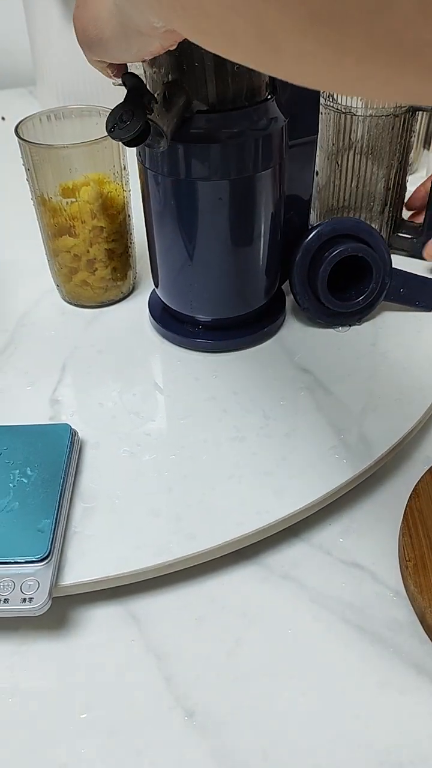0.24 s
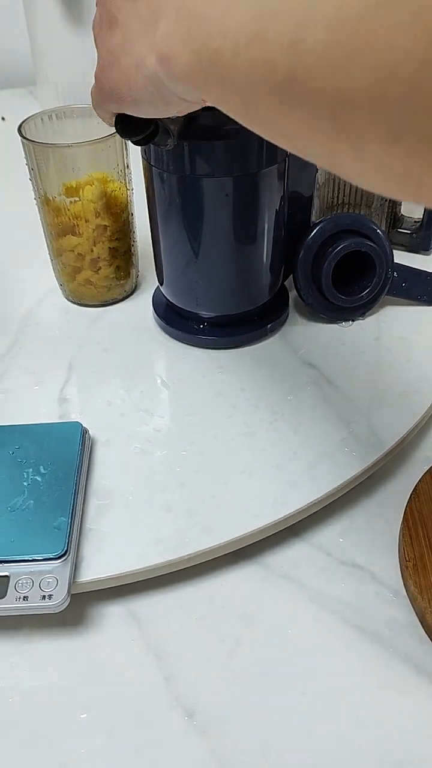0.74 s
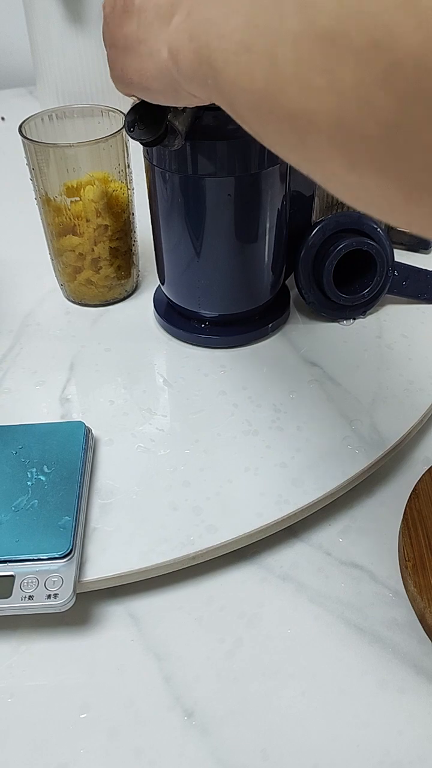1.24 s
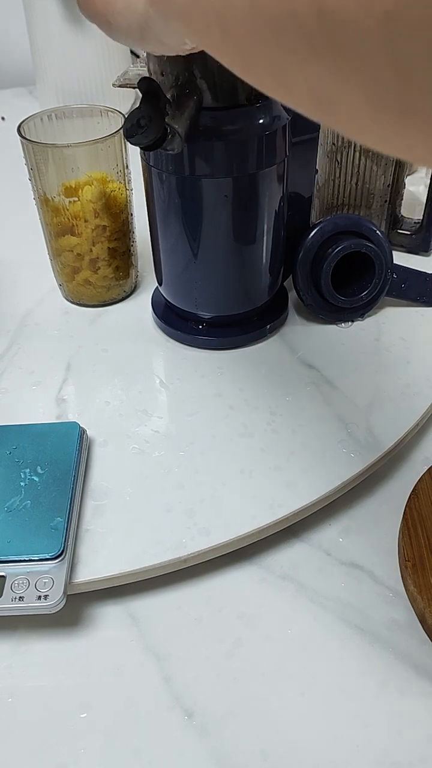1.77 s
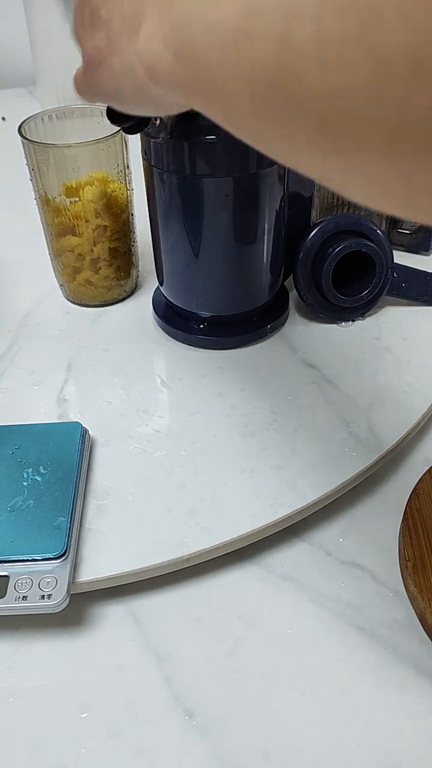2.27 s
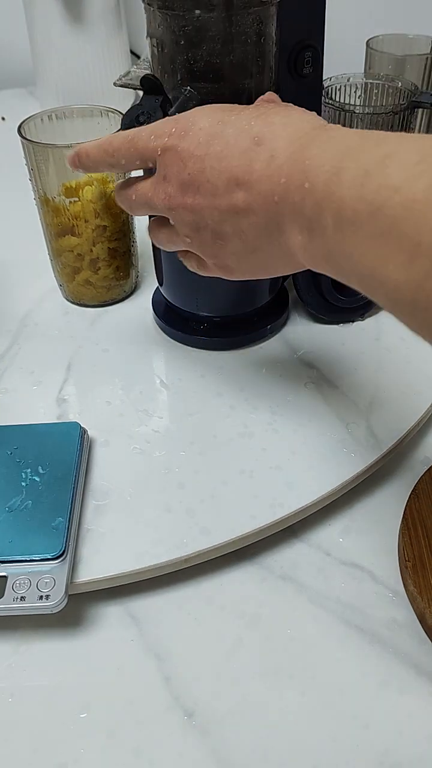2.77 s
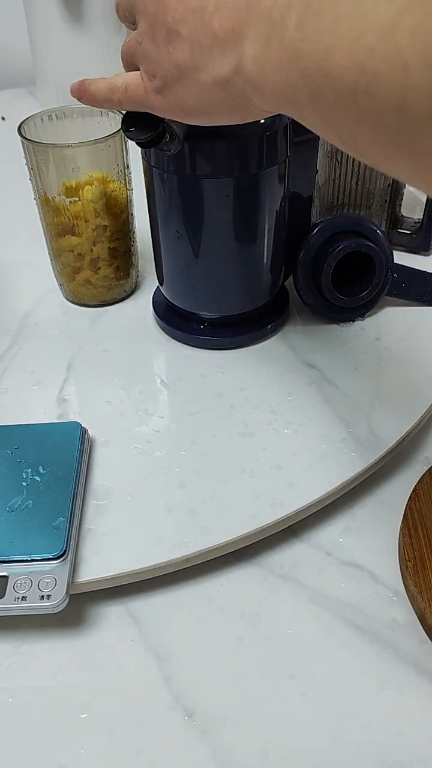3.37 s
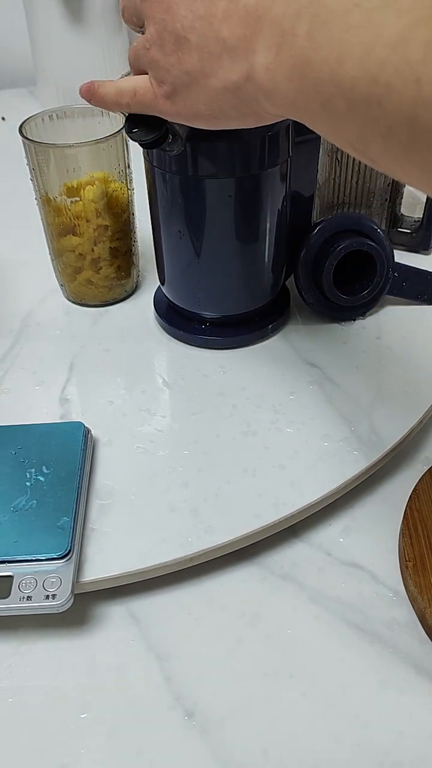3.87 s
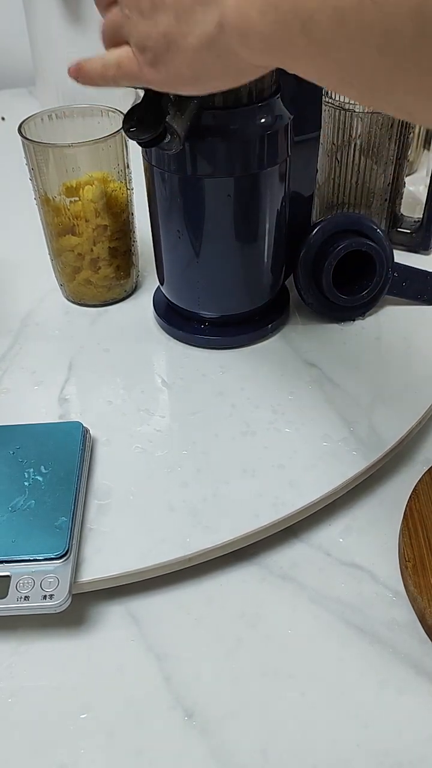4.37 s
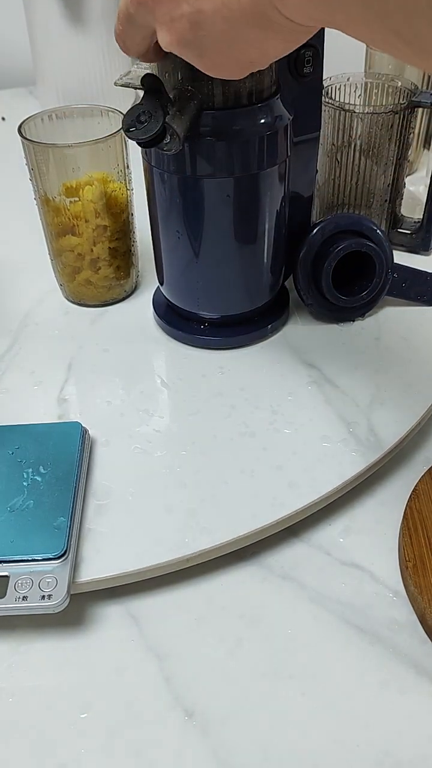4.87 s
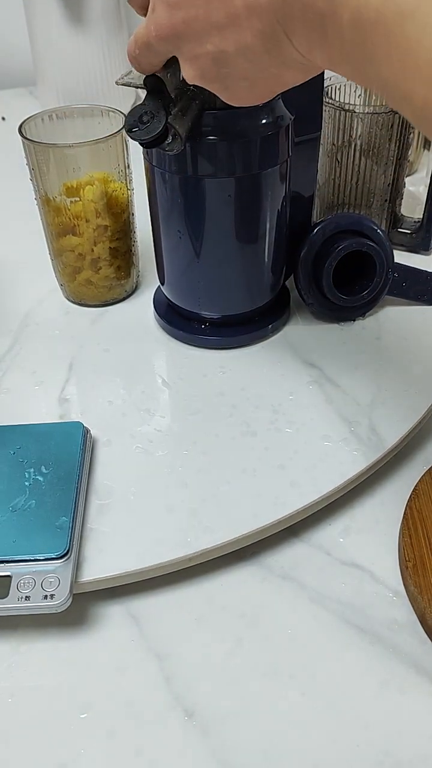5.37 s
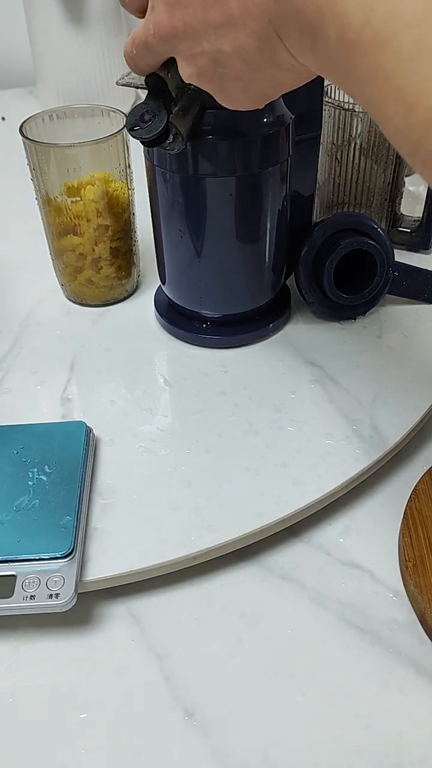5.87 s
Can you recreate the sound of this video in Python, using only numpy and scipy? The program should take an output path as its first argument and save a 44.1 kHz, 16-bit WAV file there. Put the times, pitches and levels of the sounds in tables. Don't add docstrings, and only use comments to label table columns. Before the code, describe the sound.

In a small, reflective room with quiet low room tone, a jug lands on a stone table right at 0 s, ringing briefly with a mid-pitched plastic clack, rocking at once and settling on another edge at 0.2 s. Faint finger rubbing comes around 0.6-0.8 s. Hollow plastic knocks follow at 1.0, 1.3 and 1.5 s, then a very loud, sharp snap at 1.66 s and another, the hardest, at 1.95 s, with short room echoes and a low table hum. Smaller double cracks come at 2.3 and 2.4 s, then a strong, clattering clunk at 2.7 s. From 3.1 s everything is much softer: a dull tap, a faint knock at 3.7, light ticks and small hollow taps between 4.2 and 4.8 s. After a near-quiet gap, soft skin strokes and tiny ticks run from about 5.2 s to the end near 6 s.

```python
import sys
import numpy as np
from scipy import signal
from scipy.io import wavfile
from scipy.ndimage import uniform_filter1d

SR = 44100
rng = np.random.default_rng(int(sys.argv[2]) if len(sys.argv) > 2 else 0)


def unload_wav(signal):
    wavfile.write(
        sys.argv[1],
        SR,
        np.round(np.clip(np.atleast_2d(signal).T, -1, 1) * 32767).astype(np.int16),
    )


def boost(x):
    u = np.asarray(x, float) / 20
    return 10 ** u


N = 270326

# frequency in Hz, level in dB.
TONE_SPECTRUM = [(12, -43), (20, -3), (75, -15), (205, -5), (401, -11), (702, -10.5), (808, -14),
                 (956, -11), (3370, -28.5), (3670, -27), (6990, -33), (8040, -42.5), (9510, -40),
                 (14500, -30.5), (16200, -41.5)]
TONE_DB = -59
# frequency in Hz, left minus right in dB.
TONE_BALANCE = [(60, 3), (180, 2), (550, -0.5), (1650, 0.5), (4970, -2), (15000, 1.5)]
# frequency in Hz, bandwidth in Hz, level in dB.
MACHINE_HUMS = [(180, 19, -70), (221, 31, -72), (287.4, 19, -72.5), (544, 5.9, -78), (592, 29, -77.5),
                (742, 16, -80)]
# frequency in Hz, correlation from 0 to 1.
PORT_LIKENESS = [(60, 0.7), (130, 0.28), (290, 0.62), (640, 0.19), (1400, 0.02), (16000, 0.01)]

# start in seconds, blow in dB, ring length as a factor.
JUG_TOUCHES = [
    (0.005, -10.5, 0.92),
    (0.053, -15, 0.78),
    (0.121, -27, 0.74),
    (0.207, -16.5, 1),
]
# frequency in Hz, level in dB, t60 in seconds.
JUG_MODES = [(123, -35, 0.1), (332, -16, 0.076), (443, -11, 0.11), (522, -5.5, 0.086), (572, -13.5, 0.14),
             (735, -7, 0.14), (750, -12, 0.11), (770.5, 2, 0.074), (893, -19, 0.034), (1280, -10, 0.04),
             (1045, -5, 0.047), (1150, -4, 0.05), (1393, -8.5, 0.051), (1590, 0.5, 0.032),
             (1781, -11.5, 0.03), (2105, -16.5, 0.07), (2520, -17.5, 0.036), (3560, -24.5, 0.063),
             (3700, -27, 0.05), (4520, -29, 0.05), (4910, -27, 0.043), (5880, -27.5, 0.071),
             (6330, -38, 0.04), (6890, -34, 0.062), (7950, -32, 0.033), (8840, -46, 0.053),
             (10000, -49, 0.025)]
# frequency in Hz, gain in dB.
OTHER_EDGE_GAIN = [(100, 7), (340, -0.5), (450, 5.5), (560, -3.5), (750, 1.5), (1050, 10.5), (1140, -13),
                   (1400, 9.5), (1580, -13), (1800, 15.5), (2100, -3), (2700, 4.5), (3600, -10), (9000, -3)]

# start in seconds, level in dB, bright part in dB, top part in dB.
RIM_CRACKS = [(0.0054, -26, -17, -18), (0.207, -24.5, -11.5, -14.5), (0.762, -67, 15, 6),
              (0.965, -52, -2, -38), (1.0185, -29.5, -10.5, -31), (1.269, -32.5, -2.5, -21),
              (1.491, -46.5, -15, -20), (1.5134, -34, -7.5, -26.5), (1.5715, -49, -22, -37.5),
              (2.2867, -36, -11, -12.5), (2.292, -31, -2, -42), (2.301, -58, -7, -33.5),
              (2.3808, -36.5, -11.5, -27), (2.396, -39.5, -14, -28), (2.6865, -33, -9, -31),
              (2.6935, -29.5, -15, -19), (2.7039, -19, -13.5, -24.5), (2.7144, -23.5, -2.5, -14.5),
              (2.7222, -59, -10, -31.5)]
RIM_TICKS = [(3.1254, -48, -6, -32), (3.346, -63.5, 1, -30), (4.2073, -43.5, -5, -17.5),
             (4.3248, -53.5, -9, -27.5), (4.4574, -49, -8, -21), (4.466, -40.5, -7, -33),
             (4.6665, -48.5, -10.5, -35), (4.7772, -41, -15.5, -25), (4.796, -47.5, -3, -25),
             (5.44, -65.5, 0, -5), (5.463, -52, -12, -19), (5.617, -53, -19, -27), (5.685, -52.5, -11, -25),
             (5.698, -48, -15, -27), (5.7336, -50, -16, -28), (5.7697, -53.5, -12, -21)]
RIM_SNAPS = [(1.633, -40.5, -1, -14), (1.652, -37, -3.5, -16), (1.6546, -19, -2.5, -10),
             (1.6609, -22.5, -3.5, -18), (1.6664, -15, -11.5, -23.5), (1.926, -24.5, -6, -28),
             (1.933, -24, -6, -11), (1.9439, -24, -7.5, -16.5), (1.9382, -28, -6.5, -17),
             (1.9555, -17, -5.5, -13.5), (1.9612, -31, -12.5, -24.5), (1.9674, -33, 1.5, -25)]
# t60 in ms, rise in ms.
RIM_DECAY = [(15, 1.51), (15, 0.95), (16, 1.06)]

# start in seconds, level in dB, frequency in Hz, table hum in dB.
LANDINGS = [(0.007, -39, 526, -4.5), (0.206, -32, 508, -0.5), (1.019, -47, 236, -16),
            (1.267, -52.5, 289.9, -12), (1.517, -42, 244, -36), (1.66, -31.5, 251, -9.5),
            (1.926, -43, 240, -22), (1.9579, -35.5, 289, -9), (2.289, -41, 227, -11),
            (2.396, -43, 235.9, -10.5), (2.537, -63.5, 221, -19), (2.663, -50.5, 198, 1),
            (2.705, -30.5, 383, -35), (2.7162, -32.5, 301, -30), (3.124, -51.5, 328, -6),
            (3.742, -56, 221, -11.5), (4.207, -57, 237, -13), (4.328, -58, 265, -22),
            (4.46, -53, 221, -15.5), (4.504, -56, 259, -12), (4.602, -64, 182, -19.5),
            (4.671, -54, 239, -11), (4.779, -47.5, 216, -10), (4.94, -64, 256, -6), (5.677, -53, 221, -20),
            (5.692, -46.5, 221, -28), (5.85, -55.5, 180, -2), (6.096, -61, 173, -15)]
TABLE_HZ, TABLE_T60 = 194, 0.44
UNDER_HZ, UNDER_DB, UNDER_T60 = 121.2, -8, 0.37
THUD_T60 = 0.045

# middle in seconds, hiss in dB, top part in dB.
STROKES = [
    (0.64, -69, -79),
    (0.76, -66, -67.5),
    (3.13, -67.5, -65),
    (5.171, -71.5, -84),
    (5.31, -79, -70),
    (5.47, -69.5, -81),
    (5.67, -68, -78),
    (5.87, -72.5, -78),
    (6.08, -70.5, -81),
]
RUB_RISE_DB_PER_S, RUB_FALL_DB_PER_S = 113, 74

# start in seconds, level in dB, frequency in Hz, t60 in seconds, left minus right in dB.
SHELL_KNOCKS = [(1.023, -28.5, 815, 0.016, 5.5), (1.268, -57, 684, 0.061, -12),
                (1.515, -25.5, 1226, 0.024, 6), (2.287, -32, 700, 0.022, -1),
                (2.3, -17.5, 1150, 0.011, 10.5), (2.382, -34, 717, 0.028, -1), (2.393, -25, 1140, 0.016, 9),
                (3.127, -39, 592, 0.034, 7), (3.738, -52, 583, 0.027, 2), (4.207, -45.5, 968, 0.02, -0.5),
                (4.327, -55, 590, 0.052, -2.5), (4.465, -60, 890, 0.024, -2), (4.465, -43, 747, 0.024, -12),
                (4.673, -34.5, 592, 0.026, 8), (4.777, -34, 590, 0.019, -2.5), (4.785, -40, 818, 0.022, 2),
                (4.819, -46, 833, 0.02, -3.5), (5.694, -45, 663, 0.029, 2), (5.719, -48, 544, 0.027, -5)]
SHELL_PARTNERS = [(1.028, -21.5, 1404, 0.015, 5.5), (1.46, -37.5, 1670, 0.04, -4),
                  (1.52, -23, 1130, 0.01, 4), (1.658, -16, 1085, 0.052, 4), (1.66, -5.5, 1110, 0.018, 6.5),
                  (1.655, -15.5, 1390, 0.022, 5), (1.685, -9, 1220, 0.0067, 7),
                  (1.668, -13.5, 1940, 0.011, 11), (1.668, -25, 2670, 0.018, 9),
                  (1.935, -17.5, 1220, 0.031, 6), (1.937, -24, 1240, 0.024, 1),
                  (1.9566, -0.5, 1215, 0.013, 9.5), (1.9562, -13, 1810, 0.011, 2),
                  (1.956, -20, 2600, 0.012, 3), (1.956, -24, 3700, 0.008, 0), (1.9615, -15, 1300, .012, 0),
                  (1.957, -14, 3090, 0.025, 9.5), (1.962, -29, 1884, 0.055, -3),
                  (2.706, -35, 390, 0.026, 9), (2.7043, -22, 990, 0.017, 6.5), (2.716, -28, 440, 0.061, 6),
                  (2.7157, -8.5, 1255, 0.015, 4.5), (2.716, -27.5, 812, 0.086, 3),
                  (2.716, -24.5, 650, 0.035, 5), (2.716, -30, 1920, 0.04, 4), (2.7045, -22, 2770, 0.015, 9),
                  (2.7152, -24.5, 5245, 0.02, 6), (2.7155, -24, 2600, 0.018, 3),
                  (2.707, -29, 210, 0.044, -4), (2.74, -26.5, 1330, 0.04, 3),
                  (3.126, -48.5, 1000, 0.038, 8), (4.6, -43.5, 580, 0.05, 5),
                  (4.207, -47.5, 2560, .02, -0.5), (4.207, -49, 3650, .02, 0),
                  (4.466, -44.5, 2720, .025, 0), (4.466, -43, 3670, 0.022, 0), (4.667, -52, 2580, .02, 0),
                  (4.777, -45, 2820, 0.019, 0.5), (5.463, -56, 2800, 0.027, 0), (1.491, -50, 3050, .02, 0),
                  (2.29, -34, 2190, .025, 0), (1.516, -41, 511, .03, 0), (1.516, -38, 720, .03, 0),
                  (1.66, -25.5, 620, .02, 2)]
NEAR_DB, NEAR_DB_PER_DB, NEAR_DB_PER_OCTAVE = -9.5, 0.13, 1.5
PURER_DB = -4

# delay at left in ms, delay at right in ms, level in dB.
FIRST_BOUNCES = [
    (1.1, 2.1, -9),
    (2.7, 1.9, -15),
    (4.3, 5.2, -18),
    (7.4, 6.4, -9),
    (10.5, 13, -10.5),
]
# frequency in Hz, t60 in seconds.
WALL_T60 = [(150, 0.34), (400, 0.43), (1040, 0.39), (2760, 0.5), (7280, 0.5), (14000, 0.25)]
WALLS_DB = -0.5
# frequency in Hz, gain in dB.
LEFT_COLOUR = [(100, 2.5), (5000, -3.5), (7000, -2.5), (7800, -5), (8300, -3.5), (9000, 3), (11000, 1.5),
               (16000, 0)]
# frequency in Hz, gain in dB.
RIGHT_COLOUR = [(100, 4), (4500, -2.5), (6000, -0.5), (7100, 12), (7800, -2.5), (8500, -24), (10000, -23.5),
                (11500, -4), (16000, -7.5)]
LAG_S = 0.0003
BASS_CUT_HZ, TOP_HZ = 120, 15750


def evened(x):
    return x / np.sqrt(np.mean(x ** 2) + 1e-20)


def read(points, hz):
    f, value = np.transpose(points)
    return np.interp(np.log(hz + 1), np.log(f + 1), value)


def add(mix, s, sound):
    for c in range(2):
        part = mix[c, round((s + c * LAG_S) * SR):][:sound.shape[1]]
        part += sound[c, :len(part)]


def rings(hz, db, t60, rise, spread_db, turn):
    t = np.arange(round((np.max(t60) + 3 * rise) * SR)) / SR
    hz, db, t60 = (np.reshape(v, (-1, 1)) for v in (hz, db, t60))
    fade = boost(db - 60 * t / t60) * (1 - np.exp(-(t / rise) ** 2))
    strength, phase, twist = rng.standard_normal((3, len(hz), 1))
    ports_heard = []
    for side in (1, -1):
        wave = np.sin(2 * np.pi * hz * t + 2 * phase + side * turn * twist)
        ports_heard.append((fade * boost(side * spread_db * strength) * wave).sum(0))
    return np.array(ports_heard)


def noise(shape_db, size):
    hop = size // 4
    hz = np.fft.rfftfreq(size, 1 / SR)
    a, b, c, d = rng.standard_normal((N // hop + 5, len(hz), 4)).T
    same = read(PORT_LIKENESS, hz)[:, None]
    left = a + 1j * b
    right = same * left + np.sqrt(1 - same ** 2) * (c + 1j * d)
    spectra = np.array([left, right]) * boost(shape_db(hz))[..., None]
    return evened(signal.istft(spectra, nperseg=size, noverlap=size - hop)[1][:, :N])


def room_tone():
    def shape_db(hz):
        return read(TONE_SPECTRUM, hz) + np.outer([0.5, -0.5], read(TONE_BALANCE, hz))

    out = boost(TONE_DB - 3.5) * noise(shape_db, size=1024)
    for hz, width, db in MACHINE_HUMS:
        r = np.exp(-np.pi * width / SR)
        resonator = [1, -2 * r * np.cos(2 * np.pi * hz / SR), r * r]
        out += boost(db) * evened(signal.lfilter([1], resonator, rng.standard_normal(N)))
    return out


def jug(mix):
    hz, db, t60 = np.transpose(JUG_MODES)
    high = hz > 1900
    hz, db, t60 = (np.r_[v, v[high], v[high]] for v in (hz, db, t60))
    hz = hz * np.r_[np.ones(len(JUG_MODES)), np.repeat([0.982, 1.02], high.sum())]
    for k, (s, blow_db, length) in enumerate(JUG_TOUCHES):
        edge_db = read(OTHER_EDGE_GAIN, hz) * (k == len(JUG_TOUCHES) - 1)
        levels = db + edge_db + blow_db - 5
        sound = rings(hz, levels, t60 * length, 0.0011, spread_db=2, turn=0.75)
        add(mix, s - 0.0005, sound * boost([[1.5], [-1.5]]))


def cracks(mix):
    for rows, (t60_ms, rise_ms) in zip((RIM_CRACKS, RIM_TICKS, RIM_SNAPS), RIM_DECAY):
        for s, db, bright_db, top_db in rows:
            hz = np.geomspace(700, 15800, num=70) * np.exp(0.012 * rng.standard_normal(70))
            colour = read([(700, -9), (1400, -1.5), (2600, 0.5),
                           (5600, bright_db + 7.5), (12000, top_db + 6.5)], hz)
            t60 = t60_ms / 1000 * (2000 / hz) ** 0.18
            sound = rings(hz, db + colour - 6.5, t60, rise_ms / 1000, spread_db=0.6, turn=0.74)
            add(mix, s - 0.0008, sound)


def thuds(mix, top):
    for s, db, hz, hum_db in LANDINGS:
        push_hz = hz * np.array([0.4, 1, 1.3, 1.5])
        push_db = db + np.array([-14, 3.5, -3, 0])
        add(mix, s - 0.002, rings(push_hz, push_db, THUD_T60, 0.00068, spread_db=0.47, turn=0.052))
        table_db = db + hum_db + np.array([4.5, UNDER_DB])
        table_t60 = [TABLE_T60, UNDER_T60]
        add(top, s, rings([TABLE_HZ, UNDER_HZ], table_db, table_t60, 0.043, spread_db=0.2, turn=0.05))


def rubs():
    t, gains = np.arange(N) / SR, np.zeros((2, N))
    for s, hiss_db, top_db in STROKES:
        stroke_db = np.minimum(RUB_RISE_DB_PER_S * (t - s), RUB_FALL_DB_PER_S * (s - t))
        gains += boost([[hiss_db], [top_db]]) * boost(stroke_db)
    gains = uniform_filter1d(gains, 2000)
    hiss_shape = [(800, -8), (2500, 1.5), (6500, -3.5), (8000, -6.5), (9000, -67)]
    top_shape = [(7500, -17), (9000, -1), (13000, -7), (16000, -15.5)]
    hiss = noise(lambda hz: read(hiss_shape, hz), size=256)
    top = noise(lambda hz: read(top_shape, hz), size=256)
    return boost(0.5) * gains[0] * hiss + boost(-6.5) * gains[1] * top


def knocks(mix):
    ratios = np.array([0.5, 0.63, 0.78, 0.9, 1, 1.1, 1.22, 1.37, 1.55])
    main = ratios == 1
    for k, (s, db, hz, t60, pan_db) in enumerate(SHELL_KNOCKS + SHELL_PARTNERS):
        near_db = NEAR_DB + PURER_DB * (k >= len(SHELL_KNOCKS))
        near_db += NEAR_DB_PER_DB * (db + 30) + NEAR_DB_PER_OCTAVE * np.log2(hz / 1000)
        levels = db + np.where(main, 1.5, near_db + 9 * np.log2(np.minimum(ratios, 1)))
        lengths = t60 * np.where(main, 1, 0.7)
        sound = rings(hz * ratios, levels, lengths, 0.0013, spread_db=0.6, turn=0.35)
        add(mix, s - 0.0012, sound * boost([[pan_db / 2], [-pan_db / 2]]))


def bounces(x):
    taps = np.zeros((2, 700))
    taps[:, 0] = 1
    for k, (left_ms, right_ms, db) in enumerate(FIRST_BOUNCES):
        at = [round(left_ms * SR / 1000), round(right_ms * SR / 1000)]
        taps[[0, 1], at] = (-1) ** k * boost(db)
    return signal.oaconvolve(x, taps, axes=1)[:, :N]


def shared_bass(x, cut_hz):
    low = signal.butter(2, cut_hz, fs=SR, output="sos")
    return x + signal.sosfiltfilt(low, x.mean(0) - x)


def walls(x):
    out, t = np.zeros((2, N)), np.arange(N) / SR
    low = signal.butter(2, 420, fs=SR, output="sos")
    grid = np.arange(130, SR // 2, 12)
    for k in range(3):
        taps = np.zeros((2, SR // 2 + 20))
        at = grid + rng.integers(0, 12, (2, len(grid)))
        np.put_along_axis(taps, at, rng.choice([-1.0, 1.0], at.shape), 1)
        taps *= 1 - 0.38 * np.exp(-np.arange(taps.shape[1]) / SR / 0.004)
        taps[1] += signal.sosfiltfilt(low, taps[0] - taps[1])
        hz, s, z = signal.stft(taps, SR, nperseg=256)
        decay = boost(-60 * s / read(WALL_T60, hz)[:, None])
        tail = signal.istft(z * decay, SR, nperseg=256)[1]
        turn = np.sqrt(2 / 3) * np.cos(np.pi * (1.7 * t + k / 3))
        out += signal.oaconvolve(x * turn, tail / np.linalg.norm(tail[0]), axes=1)[:, :N]
    return out


def ports(x):
    hz = np.abs(np.fft.fftfreq(1024, 1 / SR))
    logs = np.log(boost([read(LEFT_COLOUR, hz), read(RIGHT_COLOUR, hz)]))
    response = np.exp(logs - 1j * signal.hilbert(logs).imag)
    taps = np.fft.ifft(response).real[:, :512]
    return signal.oaconvolve(x, taps, axes=1)[:, :N]


def scene():
    tone = room_tone()
    hits, top = np.zeros((2, 2, N))
    jug(hits)
    cracks(hits)
    thuds(hits, top)
    rubbing = rubs()
    knocks(hits)
    hits = shared_bass(hits, 450)
    hits = signal.sosfilt(signal.butter(3, BASS_CUT_HZ, "high", fs=SR, output="sos"), hits)
    heard = bounces(hits) + boost(WALLS_DB) * walls(hits[[1, 1]])
    heard = shared_bass(heard, 330)
    return ports(heard + top + rubbing) + tone


def roll_off(x):
    return signal.sosfilt(signal.butter(12, 16470, fs=SR, output="sos"), x)


def record(dry):
    started = dry * np.clip(np.arange(N) / SR / 0.001, 0, 1)
    edge = signal.firwin(255, TOP_HZ, window=("kaiser", 2.5), fs=SR)
    mix = signal.oaconvolve(started, edge[None], "same")
    return roll_off(mix)


dry = scene()
out = record(dry)
unload_wav(out)
```